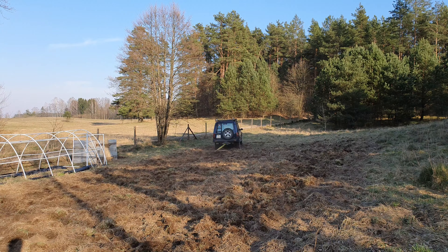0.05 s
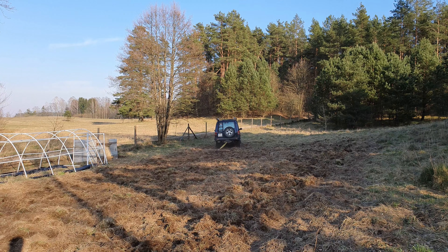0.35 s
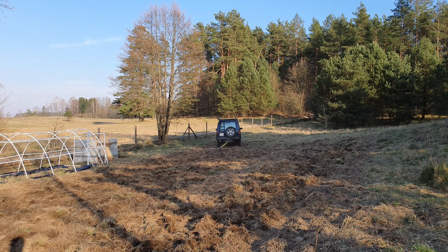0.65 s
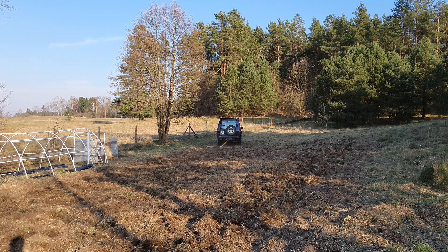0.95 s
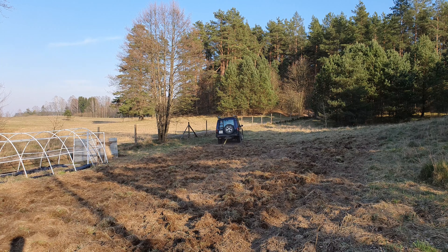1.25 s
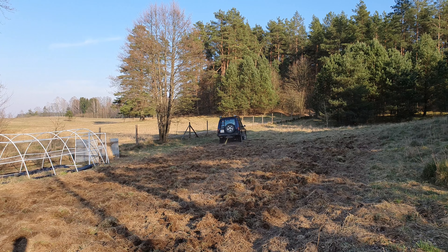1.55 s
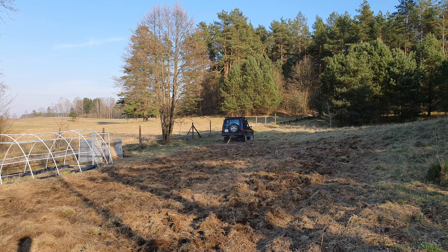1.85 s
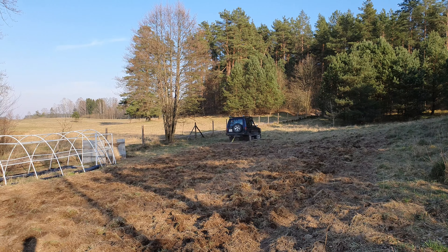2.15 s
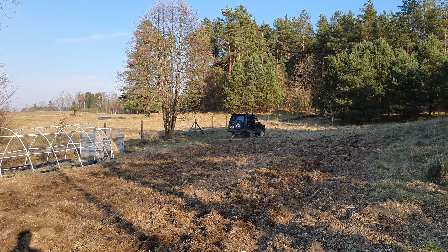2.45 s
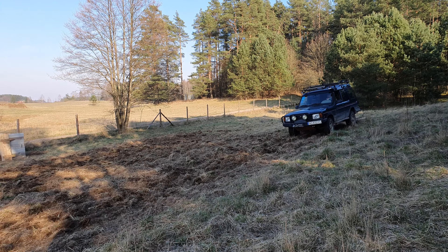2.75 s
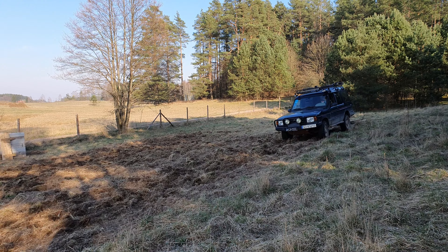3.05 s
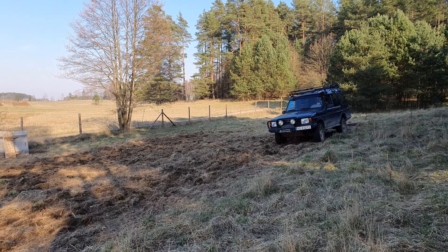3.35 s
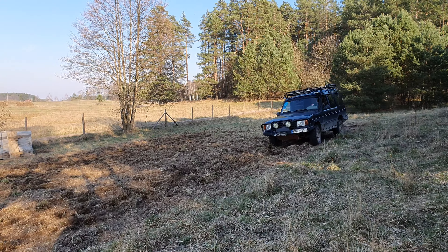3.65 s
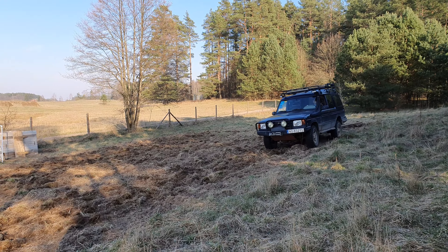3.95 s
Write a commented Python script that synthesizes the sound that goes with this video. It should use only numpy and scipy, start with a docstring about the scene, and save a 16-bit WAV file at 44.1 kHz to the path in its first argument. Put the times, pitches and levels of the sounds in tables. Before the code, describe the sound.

Irregular metal clanks and high clinks come from a harrow towed across rough ground, over a low diesel drone. Past halfway the engine suddenly knocks louder and speeds up slightly. Dry stalks snap and gusts thump the microphone outdoors.

```python
"""A diesel off-roader drags a steel harrow (a frame with spikes, called tines) over a rough field.
The engine's firings make a low exhaust drone and a knock. Steel hits steel, so the frame clanks and
rattles and the tines ring; dry stalks snap. It is heard first from behind, then abruptly from the
front right, where the knock is louder, tyres rustle in grass and the engine speeds up a little.
Wind buffets the microphone, mostly on the left."""
import sys
import numpy as np
from scipy import signal
from scipy.fft import rfft, irfft
from scipy.io import wavfile
from scipy.ndimage import uniform_filter1d

SR = 44100
rng = np.random.default_rng(int(sys.argv[2]) if len(sys.argv) > 2 else 0)


def persist_wave(psi):
    """Save psi, clipped to +-1, as 16-bit WAV."""
    counts = np.round(np.clip(psi, -1, 1) * 32767).astype(np.int16)
    wavfile.write(sys.argv[1], SR, np.atleast_2d(counts).T)


N = 176400
T = np.arange(N) / SR
FRONT_START_S, FRONT_FIRING_S = 2.5385, 2.554   # the listener jumps to the front; first firing there
FRONT = T >= FRONT_START_S

# how fast the engine fires (time [s], rate [Hz])
FIRING_RATE_BEHIND = [(0,49.26),(.33,43.57),(.7,47.15),(1.0,42.68),(1.36,45.22),(1.66,44.84),(2.2,46.73),(2.53,44.85)]
FIRING_RATE_FRONT = [(2.54,46.14),(2.66,49.7),(2.76,49.3),(3.0,46.38),(3.15,49.87),(3.35,53.01),(3.6,51.31),(3.8,52.48),(4,52.38)]
# exhaust drone (time [s], level [dB])
DRONE_LEVEL = [(0,-38.5),(.28,-37),(.35,-45),(.7,-39.5),(.94,-43),(1.47,-38),(1.54,-49),(1.75,-49.5),(2.0,-38),(2.5,-40.5),(3.0,-40.5),(3.3,-39.5),(3.8,-37.5),(4,-34.5)]
# tones in the drone (multiple of the firing rate, gain behind [dB], gain in front [dB])
DRONE_TONES = [(1,-6.5,-33),(1.5,-44,-5.5),(2,-0.5,-2.5),(2.5,-30,-19.5),(3,-15,-12.5),(3.5,-32.5,-20.5),(4,-26,-13),(5,-35.5,-24.5),(6,-46,-24.5)]
# each cylinder's knock (gain [dB])
CYLINDER_GAINS = [0.052, 0, 0.66, -.6]
# knock heard from the front (time [s], level [dB])
FRONT_KNOCK_LEVEL = [(2.54,-44),(3.0,-45.5),(3.2,-44.5),(3.55,-46.5),(4,-43)]
# tone colour of the engine block and bonnet (frequency [Hz], gain [dB])
BLOCK_COLOUR = [(100,-5),(200,2),(300,-8),(400,-6),(490,-12.5),(550,-1),(620,8),(710,0),(800,1),(880,-4),(1060,5),(1250,-2),(1420,3.5),(1950,1.5),(2350,-12.5),(2700,-6),(3700,-31.5),(8000,-22),(16000,-48)]
# steel hits steel (time [s], frame level [dB], bright contact level [dB])
CLANK_HITS = [(0.0005, -43, -53), (0.0175, -44, -60), (0.0376, -44, -42), (0.0688, -39, -52),
              (0.1227, -47, -54), (0.16, -36.5, -42), (0.1734, -58, -46), (0.2004, -45.5, -51),
              (0.285, -49.5, -46.5), (0.3506, -49, -53), (0.367, -51, -47), (0.4649, -35, -37),
              (0.524, -40.5, -42), (0.5438, -60, -54), (0.6227, -46, -48), (0.6417, -54, -62),
              (0.6579, -48, -45.5), (0.743, -45.5, -66), (0.7641, -41, -50), (0.8348, -43, -53.5),
              (0.9432, -34.5, -37), (0.97, -37.5, -36.5), (0.9804, -39.5, -34), (0.9917, -48, -44),
              (1.0236, -32, -40.5), (1.0556, -35.5, -68), (1.0742, -39, -41.5), (1.2198, -41.5, -47.5),
              (1.3518, -34.5, -39), (1.3647, -43, -41), (1.4287, -43, -33), (1.4408, -32.5, -34),
              (1.4608, -36.5, -38.5), (1.49, -43, -47), (1.499, -39, -46), (1.6152, -39, -49),
              (1.63, -45, -56), (1.6711, -44, -50), (1.698, -47.5, -44.5), (1.7426, -65, -44.5),
              (1.8452, -44.5, -53), (1.9647, -37, -60), (1.9755, -38.5, -64), (2.0815, -38, -43.5),
              (2.097, -39, -37), (2.194, -47, -46), (2.2485, -40, -48.5), (2.281, -54, -47.5),
              (2.3007, -43, -51), (2.477, -53, -56), (3.0226, -45.5, -43.5), (3.1403, -42, -39),
              (3.2368, -46, -45), (3.312, -44.5, -40), (3.3706, -45.5, -39.5), (3.589, -57, -44.5),
              (3.8685, -64, -48)]
# rattle of the dragged harrow (time [s], level [dB])
RATTLE_LEVEL = [(0,-43.5),(.1,-48.5),(.26,-55),(.33,-49),(.42,-48),(.56,-49),(.64,-45),(.73,-53.5),(.91,-56.5),(1.0,-40),(1.1,-50),(1.17,-55.5),(1.3,-56),(1.4,-44),(1.46,-34),(1.55,-50.5),(1.8,-59),(1.99,-49.5),(2.15,-48),(2.32,-60),(2.42,-64),(2.9,-55.5),(3.18,-45.5),(3.55,-57),(4,-57.5)]
# tone colours of the frame and the bright contacts (frequency [Hz], gain [dB])
FRAME_COLOUR = [(200,-29),(500,-25),(680,-5.5),(1050,-7.5),(1270,-12),(1500,0),(1900,4.5),(2500,-0.5),(3000,2.5),(3500,-6),(4500,-6.5),(6000,-16.5),(16000,-54.5)]
CONTACT_COLOUR = [(1500,-30),(3500,-8),(4700,4),(6000,8.5),(7000,3),(8600,2),(10000,-1.5),(12500,-10.5),(16000,-25.5)]
# notes the frame rings at (frequency [Hz], gain [dB], time to fade by 60 dB [s])
FRAME_NOTES = [(1775,-3.5,0.038),(1844,-3.5,0.14),(1932,-3.5,0.094),(2050,-5.5,0.024),(2296,-7,0.068),(2430,-9,0.12),(2845,-6,0.08),(3090,-8.5,0.015),(5920,13.5,0.037),(7950,22,0.13)]
# wind on the microphone (time [s], left level [dB], right level [dB])
GUST_LEVEL = [(0,-53,-41.5),(.22,-31.5,-35),(.37,-44,-43),(.53,-39,-35.5),(.6,-26.5,-32),(.72,-31,-40),(.84,-42.5,-42),(1.1,-45.5,-38.5),(1.24,-30,-29.5),(1.4,-54,-45),(1.6,-73,-42),(1.74,-43,-49),(1.83,-39.5,-36.5),(2.02,-35,-36.5),(2.13,-50,-40.5),(2.55,-40.5,-40),(2.74,-27.5,-63),(2.88,-35.5,-61),(3.12,-24.5,-36),(3.29,-31,-47),(3.36,-18,-50),(3.44,-31,-63),(3.63,-27.5,-47),(3.72,-16,-47),(3.86,-27,-49),(4,-23,-54)]
# short puffs of wind (time [s], left level [dB], right level [dB], centre frequency [Hz])
PUFFS = [(0.59,-34.5,-60,259),(0.677,-44,-69,218),(1.222,-59,-41,158),(1.498,-41.5,-43,303),(1.571,-46.5,-57,266),(1.858,-45,-39.5,228.8),(3.372,-31,-46,184),(3.667,-39.5,-67,258),(3.83,-36,-43,147),(3.875,-29,-52,190)]
# tone colours of the gusts and the distant air (frequency [Hz], gain [dB])
GUST_COLOUR = [(15,-28.5),(28,-14.5),(42,-2),(65,0),(100,-8),(150,-13.5),(250,-36),(500,-43),(2000,-65)]
AIR_COLOUR = [(60,10.5),(200,-3),(400,-2.5),(1000,-10),(2000,-5.5),(4000,-35.5),(10000,-27),(16000,-30)]
# stalks break (time [s], level [dB])
STALK_SNAPS = [(0.0384,-32),(.366,-41),(0.4625,-41),(0.9757,-30),(1.0229,-34),(1.4313,-30),(2.0955,-51),(2.1954,-44),(3.0223,-44),(3.103,-43),(3.14,-30),(3.158,-39),(3.1748,-35),(3.2375,-37),(3.3714,-31),(3.382,-42),(3.3974,-42)]
# the frame hits the ground (time [s], level [dB])
GROUND_HITS = [(.08,-41),(0.393,-39),(0.407,-36.5),(0.42,-35),(.605,-40.5),(0.63,-38.5),(1.46,-48)]
# tone colours of snaps, ground hits and dry grass (frequency [Hz], gain [dB])
SNAP_COLOUR = [(1500,3),(3500,4),(6000,-10.5),(8300,3.5),(10500,5),(12500,-3.5),(16000,-26)]
CLONK_COLOUR = [(300,-24),(650,-12.5),(790,9),(920,-8),(1080,2),(1280,-4),(1500,4.5),(1850,5),(2500,-5.5),(6000,-50),(14000,-59)]
GRASS_COLOUR = [(1500,7.5),(3000,11.5),(4200,0.5),(5700,3),(7500,-2),(8700,-2),(10500,1.5),(13000,-10),(16000,-10)]
# a tine rings (time [s], frequency [Hz], level [dB], time to fade by 60 dB [s])
TINE_NOTES = [(0.156,4700,-43,0.088),(.177,7950,-45,0.24),(.203,7920,-47.5,0.41),(.296,6153,-44,0.11),(.348,5857,-41,0.11),(0.528,7990,-43,0.35),(0.616,9490,-39,0.12),(0.658,8000,-42,0.22),(0.663,5940,-48.5,0.21),(0.765,5905,-44.5,0.25),(.80,7580,-46.5,0.14),(1.135,7030,-55.5,0.37),(1.21,5910,-44.5,0.13),(1.54,7547,-49,0.42),(1.546,5920,-46.5,0.21),(1.747,6590,-54.5,0.5),(1.856,8040,-52.5,0.34),(1.856,5980,-54.5,0.28),(1.923,8970,-50.5,0.26),(2.08,7910,-44,0.23),(2.12,9510,-58,0.3),(2.281,5866,-44.5,0.24),(2.283,7990,-49,0.37),(3.145,5944,-39,.38),(3.312,7780,-31.5,0.24),(3.33,5970,-47,0.18),(3.419,5923,-36.5,0.097),(3.448,8250,-37.5,0.075),(3.585,6013,-42,0.066),(3.745,5920,-46.5,0.068),(3.866,5920,-39.5,0.053)]
# balance between the two sides (frequency [Hz], left minus right [dB])
BALANCE = [(200,-12),(700,0),(1300,-2),(2400,-2),(4400,-5),(8000,-5),(11000,-14),(15000,-21)]


def from_db(db):
    """Turn decibels into a gain to multiply by."""
    return 10 ** (np.asarray(db) / 20)


def unit_power(x):
    """Scale a signal so its average power is one."""
    return x / np.sqrt(np.mean(x ** 2) + 1e-20)


def curves(rows):
    """Join a table's points with lines: one curve per column after the time."""
    times, *columns = np.transpose(rows)
    return np.array([np.interp(T, times, column) for column in columns])


def colour(x, points, keep_power=True):
    """Filter to a tone colour; with keep_power, white noise keeps its power."""
    size = 2 * N
    hz, db = np.transpose(points)
    gain = from_db(np.interp(np.log(np.arange(N + 1) * SR / size + 1), np.log(hz), db))
    cepstrum = irfft(np.log(unit_power(gain) if keep_power else gain))
    cepstrum[1:N] *= 2   # folded so the filter rings after a hit, never before
    cepstrum[N + 1:] = 0
    return irfft(rfft(x, size) * np.exp(rfft(cepstrum)))[..., :N]


def drift(per_s):
    """A random wander of about one, with per_s new values a second."""
    values = rng.standard_normal(400)
    return unit_power(np.interp(T * per_s, np.arange(len(values)), values))


def stereo_noise(shared):
    """White noise, partly the same on both sides."""
    return np.sqrt(shared) * rng.standard_normal(N) + np.sqrt(1 - shared) * rng.standard_normal((2, N))


def blows(times, db, decay_s):
    """Loudness curve of sudden hits that die away; their powers add."""
    power = np.zeros(N)
    starts = np.clip((np.asarray(times) * SR).astype(int), 0, N - 1)
    np.add.at(power, starts, from_db(db) ** 2)
    return np.sqrt(signal.lfilter([1], [1, -np.exp(-2 / (decay_s * SR))], power + 1e-18))


def clicks(per_s, spread_db):
    """Random clicks of uneven size."""
    sizes = from_db(spread_db * np.minimum(rng.exponential(1, N), 3)) * rng.choice([-1, 1], N)
    return unit_power(sizes * (rng.random(N) < per_s / SR))


def ring(t, hz, t60):
    """A pure tone that fades by 60 dB in t60 seconds."""
    return np.sin(2 * np.pi * hz * t) * np.exp(-np.log(1000) * t / t60)


def exhaust_drone(rate, firings, boom_hz=157.2, boom_width_hz=4.1, boom_db=9):
    """Wavering tones follow the firings; each booms as it nears the exhaust's own note."""
    drone = 0
    for multiple, behind, front in DRONE_TONES:
        boom = boom_db / (1 + ((multiple * rate - boom_hz) / boom_width_hz) ** 2)
        db = curves(DRONE_LEVEL)[0] + np.where(FRONT, front, behind) + boom + 3 * drift(16)
        drone += np.sqrt(2) * from_db(db) * np.sin(2 * np.pi * (multiple * firings + rng.random()))
    return drone


def diesel_knock(firings, second_knock_delay_s=.0038, behind_db=-63.5):
    """Each firing knocks the engine block twice in quick succession."""
    times = T[1:][np.diff(np.floor(firings)) > 0]
    db = np.resize(CYLINDER_GAINS, len(times)) + .5 * rng.standard_normal(N)[:len(times)]
    hits = blows(np.r_[times, times + second_knock_delay_s], np.r_[db, db], decay_s=.0045)
    loudness = unit_power(hits + .13)   # some noise stays between hits
    knock = colour(loudness * rng.standard_normal(N), BLOCK_COLOUR)
    knock /= np.sqrt(uniform_filter1d(knock ** 2, size=880))   # evens out the firings
    return from_db(np.where(FRONT, curves(FRONT_KNOCK_LEVEL)[0], behind_db)) * knock


def harrow(front_boost_db=5.5):
    """Steel hits steel: clanks over a dense rattle, all of which sets the frame ringing."""
    times, frame_db, bright_db = np.transpose(CLANK_HITS)
    rattle = from_db(curves(RATTLE_LEVEL)[0]) * clicks(per_s=900, spread_db=3.5)
    crack, chatter = rng.standard_normal(N), clicks(per_s=600, spread_db=4.7)

    def clanks(db):
        """Each clank is a sharp crack with a softer, longer chatter."""
        return blows(times, db, decay_s=.0046) * crack + blows(times, db - 9.5, decay_s=.026) * chatter

    frame_db = frame_db + front_boost_db * (times > FRONT_START_S)
    frame = colour(clanks(frame_db + 1) + from_db(-2.5) * rattle, FRAME_COLOUR)
    bright = colour(clanks(bright_db + 1) + from_db(-8.5) * rattle, CONTACT_COLOUR)
    return from_db(3.5) * frame_ring(frame) + flicker(frame + bright)


def frame_ring(shaking):
    """The shaken frame rings at its own notes, each by a changing amount."""
    out = 0
    for hz, db, t60 in FRAME_NOTES:
        note = signal.oaconvolve(shaking * drift(29.98), ring(T[:SR // 4], hz, t60))[:N]
        build_up = t60 * SR / (2 * np.log(1000))   # gain that comes from ringing on
        out += from_db(db) * note / build_up
    return out


def flicker(x, depth_db=2.5, changes_per_s=80):
    """Narrow frequency bands swell and shrink on their own from contact to contact."""
    edges_hz = np.geomspace(600, 15000, 20)
    band_number = np.searchsorted(edges_hz, np.arange(N // 2 + 1) * SR / N)
    spectrum, out = rfft(x), 0
    for k in range(len(edges_hz) + 1):
        band = irfft(spectrum * uniform_filter1d((band_number == k) * 1., size=600), N)
        out += band * from_db(depth_db * drift(changes_per_s))
    return unit_power(out) * np.std(x)


def forest_echo(x, t60=.18):
    """The forest edge scatters back a short echo, different on each side."""
    tail = rng.standard_normal((2, SR)) * from_db(-60 * T[:SR] / t60)
    tail /= np.sqrt(np.sum(tail ** 2, axis=1, keepdims=True))
    return from_db(-6) * signal.fftconvolve(x[None], tail, axes=1)[:, :N]


def wind(puff_s=.0085, half_width=.27):
    """Low gusts and short puffs hit the two sides of the microphone."""
    gusts = unit_power(colour(stereo_noise(shared=.35), GUST_COLOUR))
    swell = np.sqrt(uniform_filter1d(gusts ** 2, size=4000, axis=1) + .5)
    out = from_db(curves(GUST_LEVEL)) * gusts / swell   # tames the random swells
    eddies = stereo_noise(shared=.19)
    for time, left, right, hz in PUFFS:
        band = signal.butter(2, [hz * (1 - half_width), hz * (1 + half_width)], "band", fs=SR, output="sos")
        bump = np.exp(-.5 * ((T - time) / puff_s) ** 2)
        out += from_db([[left], [right]]) * bump * unit_power(signal.sosfilt(band, eddies))
    return out


def distant_air():
    """A faint, steady rush of air far away."""
    return from_db(-57.5) * colour(stereo_noise(shared=.67), AIR_COLOUR)


def stalks():
    """Dry stalks snap under tyres and tines, too briefly to ring."""
    return colour(blows(*np.transpose(STALK_SNAPS), decay_s=.0013) * rng.standard_normal(N), SNAP_COLOUR)


def ground_clonks():
    """The frame hits the ground with deeper clonks."""
    return colour(blows(*np.transpose(GROUND_HITS), decay_s=.016) * rng.standard_normal(N), CLONK_COLOUR)


def tines(nearby_hz=170, jostle_hz=350, rise_s=.002):
    """A tine rings high; weaker notes close by make it waver, and jostling links roughen it."""
    out = np.zeros(N)
    lowpass = signal.butter(2, jostle_hz, fs=SR, output="sos")
    for time, hz, db, t60 in TINE_NOTES:
        start = int(time * SR)
        t = T[:min(SR, N - start)]
        jostle = unit_power(signal.sosfilt(lowpass, rng.standard_normal(SR)))[:len(t)]
        offsets_hz = nearby_hz * rng.uniform(-1.003, 1, size=4)
        nearby = sum(rng.choice([-1, 1]) * ring(t, hz + offset, t60) for offset in offsets_hz)
        note = ring(t, hz, t60) + from_db(-11) * nearby
        out[start:start + len(t)] += from_db(db) * note * (1 + .3 * jostle) * (1 - np.exp(-t / rise_s))
    return out


def grass():
    """Tyres rustle in dry grass, heard only from the front."""
    return from_db(-55 + drift(6.95)) * FRONT * colour(stereo_noise(shared=.16), GRASS_COLOUR)


def scene(left_delay_s=.00016):
    """The vehicle and harrow, mostly to the right, with their echo and the wind."""
    rate = curves(list(FIRING_RATE_BEHIND) + list(FIRING_RATE_FRONT))[0]
    firings = np.cumsum(rate) / SR   # running count of firings
    firings -= FRONT * np.interp(FRONT_FIRING_S, T, firings)
    drone = exhaust_drone(rate, firings) * from_db([[.25], [-.25]])   # a touch to the left
    clatter = diesel_knock(firings) + harrow() + ground_clonks() + tines()
    field = clatter + forest_echo(clatter) + stalks() + grass()
    left = colour(field[0], [(hz, db / 2) for hz, db in BALANCE], keep_power=False)
    right = colour(field[1], [(hz, -db / 2) for hz, db in BALANCE], keep_power=False)
    left = np.where(FRONT, np.roll(left, round(left_delay_s * SR)), left)
    return np.array([left, right]) + drone + distant_air() + wind()


def record(dry, cutoff_hz=16600):
    """Cut away the very highest treble."""
    return signal.sosfilt(signal.cheby2(16, 70, cutoff_hz, fs=SR, output="sos"), dry)


dry = scene()
out = record(dry)
persist_wave(out)
```